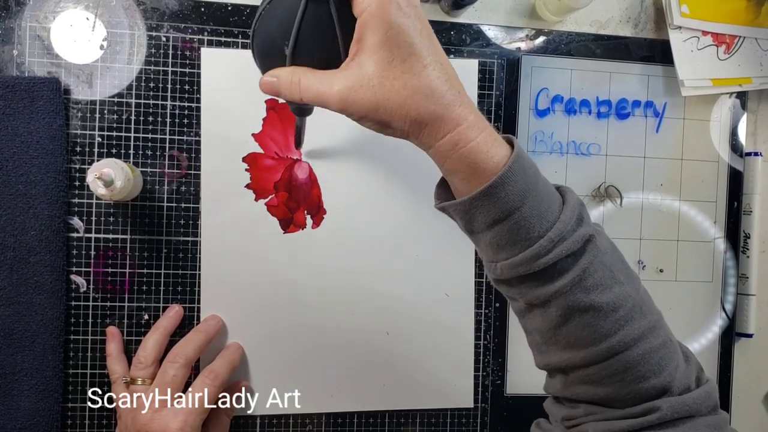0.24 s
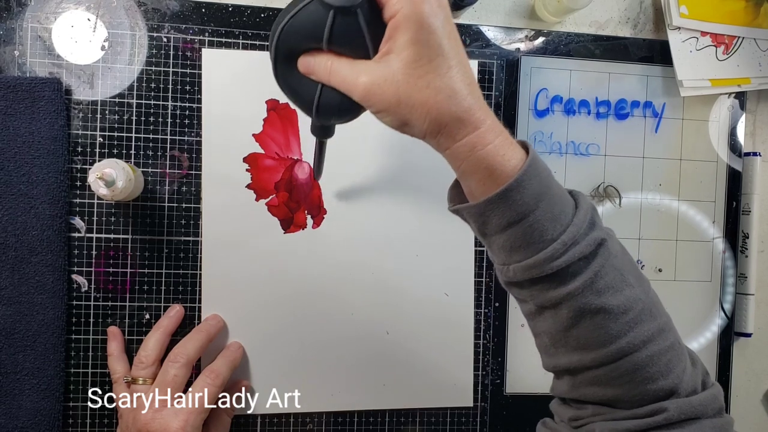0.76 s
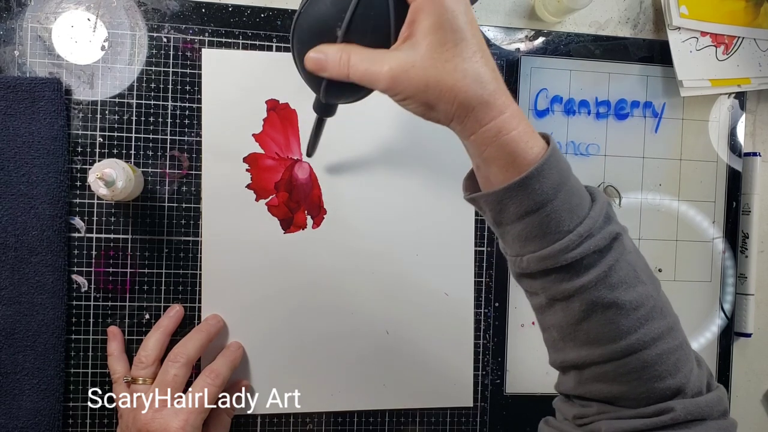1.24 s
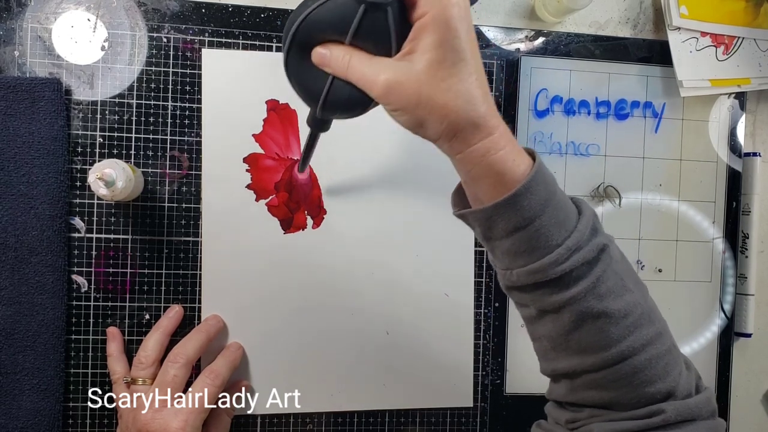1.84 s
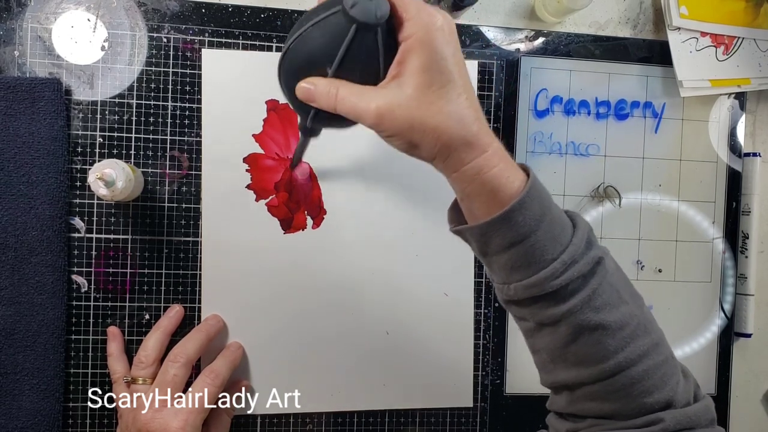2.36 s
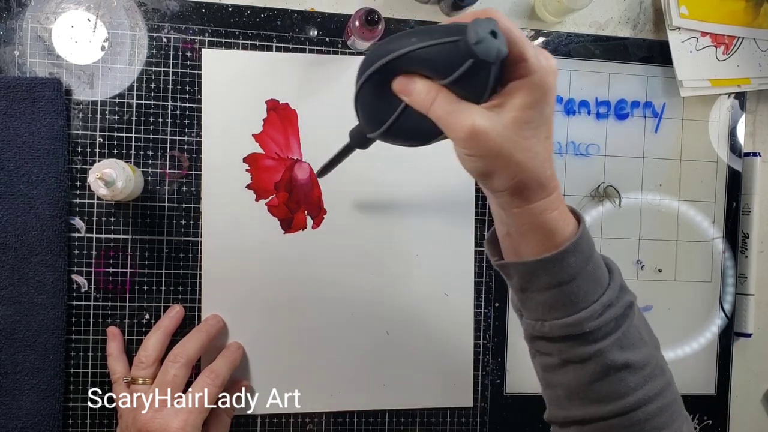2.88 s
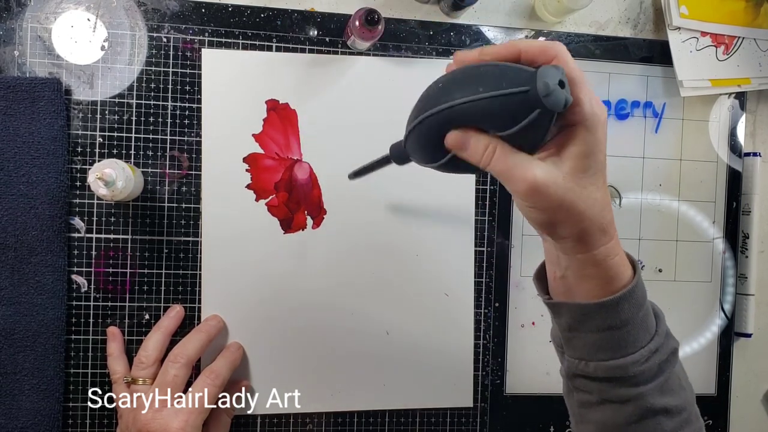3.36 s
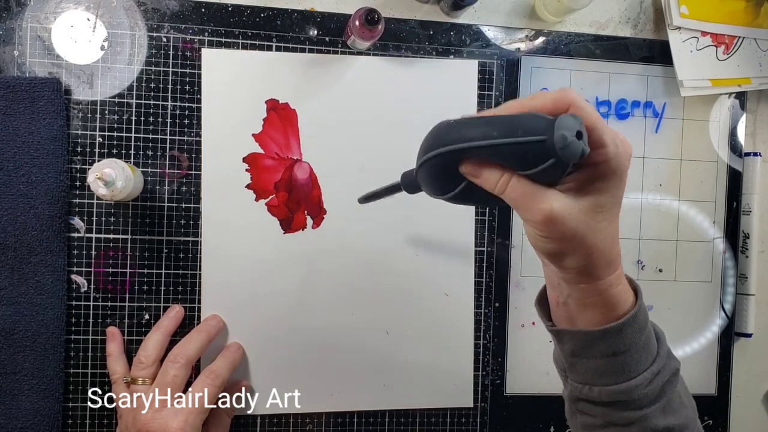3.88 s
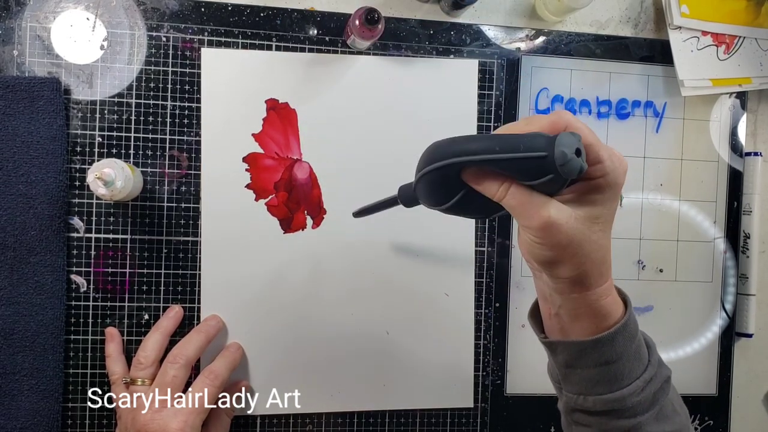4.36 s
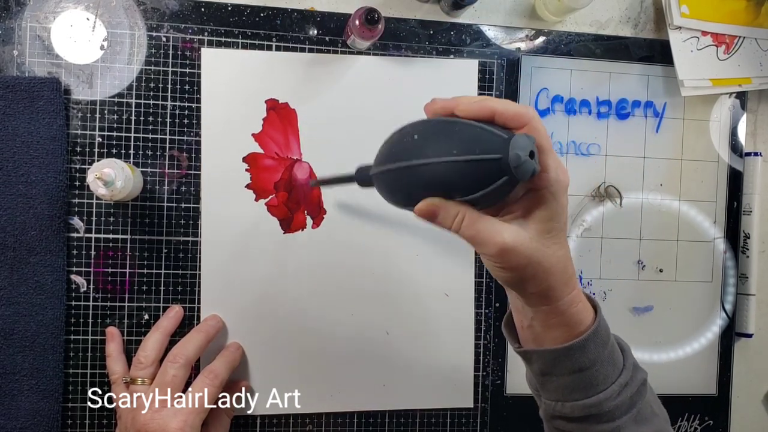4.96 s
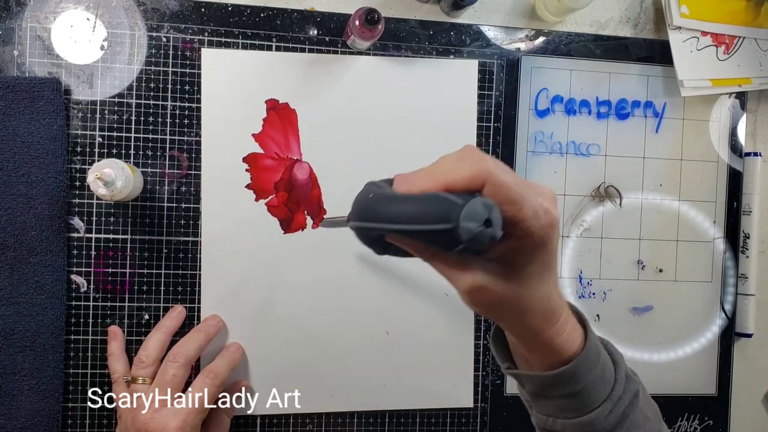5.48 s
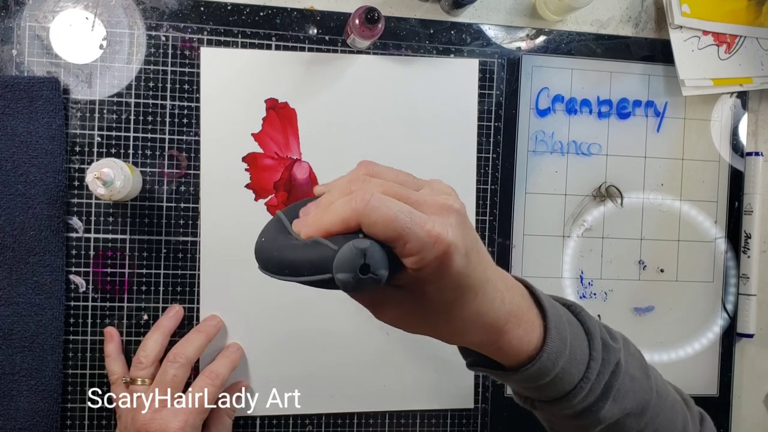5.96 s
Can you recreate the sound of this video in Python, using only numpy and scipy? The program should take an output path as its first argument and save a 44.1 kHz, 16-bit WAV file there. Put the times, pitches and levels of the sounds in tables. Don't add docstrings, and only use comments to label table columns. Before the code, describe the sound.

Close up in a small quiet room, a hand pumps a rubber air blower over paper at nearly three squeezes a second. Each squeeze gives a short bright hiss, then a softer, whistly suck as the bulb refills. Tiny high squeaks precede the early puffs. Midway the bulb is tilted; the puffs get stronger and shriller, joined by dull valve knocks and rubbery pops over faint low ventilation rumble.

```python
import sys
import numpy as np
from scipy import signal
from scipy.io import wavfile
from scipy.ndimage import uniform_filter1d

SR = 44100
rng = np.random.default_rng(int(sys.argv[2]) if len(sys.argv) > 2 else 0)


def level_to_linear(level):
    exponent = np.asarray(level, float) / 20
    return 10 ** exponent


def generate_wav(signal):
    frames = np.transpose(np.atleast_2d(signal))
    scaled = np.clip(frames, -1, 1) * 32767
    pcm = np.round(scaled).astype(np.int16)
    wavfile.write(sys.argv[1], SR, pcm)


N = 274741
TILT_S = (2.73, 3.18)


def evened(x):
    return x / np.sqrt(np.mean(x ** 2) + 1e-20)


def read(points, hz):
    f, value = np.transpose(points)
    return np.interp(np.log(hz + 1), np.log(f + 1), value)


def over_time(points, t):
    return np.interp(t, *np.transpose(points))


def tilt_at(t):
    return np.interp(t, TILT_S, [0, 1])


def resonance(hz, centre_hz, width_hz):
    return 1 / (1 + (2 * (hz - centre_hz) / width_hz) ** 2)


def add(mix, s, sound):
    part = mix[round(s * SR):][:len(sound)]
    part += sound[:len(part)]


def noise_pair(left_db, right_db, likeness, lag, size):
    a, b, c, d = rng.standard_normal((N * 4 // size + 5, size // 2 + 1, 4)).T
    same = np.clip(likeness, 0, 1)[:, None]
    left = a + 1j * b
    right = same * left + np.sqrt(1 - same ** 2) * (c + 1j * d)
    right = right * np.exp(1j * lag)[:, None]
    z = np.array([left * level_to_linear(left_db), right * level_to_linear(right_db)])
    return signal.istft(z, nperseg=size, noverlap=size * 3 // 4)[1][:, :N]


def patches(patchy_db, size, wide=3, long=8):
    field = rng.standard_normal((N * 4 // size + 5, size // 2 + 1)).T
    field = uniform_filter1d(field, wide, axis=0)
    return patchy_db * evened(uniform_filter1d(field, long, axis=1))


# pitch_hz, density_db per Hz
RUMBLE = [(15, -34), (25, -23), (48, 5), (71, 10.5), (88, -0.5), (161, -11), (485, -18.5), (547, -22.5),
          (832, -13), (920, -21.5), (1150, -26), (1290, -24), (1520, -27.5), (2710, -27.5), (3000, -25),
          (3900, -25), (6600, -120)]
# pitch_hz, likeness (0-1)
RUMBLE_LIKENESS = [(30, 1), (200, 0.64), (400, 0.57), (800, 0.22), (3000, 0)]
# start_s, level_db
GUSTS = [
    (.3, -2),
    (.61, 11),
    (.83, 2.5),
    (1.09, 4.5),
    (1.7, 13.5),
    (2.67, 4.5),
    (3.95, 12),
    (4.42, 2.5),
    (5.4, 6),
]
# pitch_hz, level_db
FAR_HISS = [(1500, -10.5), (4500, -14), (7000, -4.5), (8600, -8.5), (11000, -0.5), (15500, 2)]
# pitch_hz, left_minus_right_db
PORTS_TILTED = [(1000, 2.5), (5000, 0.5), (7000, 0.5), (8700, 5), (10000, 5), (11000, -25.5), (12500, -8),
                (13800, -28), (15300, -22.5)]


def room_air():
    size, rumble_db, hiss_db, gust_s = 4096, -69, -68.5, 0.023
    hz, t = np.fft.rfftfreq(size, 1 / SR), np.arange(N // 1024 + 5) * 1024 / SR
    swell_db = sum(db * np.exp(-((t - s) / gust_s) ** 2) for s, db in GUSTS)
    db = read(RUMBLE, hz)[:, None] + patches(2.33, size, wide=4, long=4)
    db = db + np.outer(hz < 105, swell_db - 3.0)
    rumble = noise_pair(db - 0.8, db + 0.28, read(RUMBLE_LIKENESS, hz), 0 * hz, size)
    db = read(FAR_HISS, hz)[:, None]
    hiss = noise_pair(db + 0.31 * read(PORTS_TILTED, hz)[:, None], db, 0 * hz, 0 * hz, size)
    return level_to_linear(rumble_db) * evened(rumble) + level_to_linear(hiss_db) * evened(hiss)


# pitch_hz, t60_s
ROOM_DECAY = [(150, 0.51), (2000, 0.31), (7000, 0.21), (11000, 0.17), (15000, 0.22)]
# delay_s, left_db, right_db
DESK_ECHOES = [
    (.0009, -47, -37),
    (.0017, -26, -31),
]


def room(x):
    room_db, turn_hz = -12.5, 3.1
    taps = np.zeros((6, SR // 2))
    at = np.arange(400, SR // 2 - 20, 20) + rng.integers(0, 20, (6, (SR // 2 - 401) // 20))
    np.put_along_axis(taps, at, rng.choice([-1., 1.], at.shape), 1)
    hz, t, z = signal.stft(taps, SR, nperseg=256)
    decay = level_to_linear(-60 * t / read(ROOM_DECAY, hz)[:, None])
    tails = signal.istft(z * decay, SR, nperseg=256)[1]
    tails = level_to_linear(room_db) * tails / np.linalg.norm(tails[0])
    out = x.copy()
    for k in range(3):
        share = np.sqrt(2 / 3) * np.cos(2 * np.pi * (turn_hz * np.arange(N) / SR + k / 3))
        out += signal.fftconvolve(x * share, tails[2 * k:2 * k + 2], axes=1)[:, :N]
    for s, left_db, right_db in DESK_ECHOES:
        late = round(s * SR)
        out[:, late:] += level_to_linear(np.array([[left_db], [right_db]])) * x[:, :N - late]
    return out


# start_s, peak_db
SQUEAKS = [
    (0.1895, -66),
    (0.5397, -65),
    (0.8764, -57),
    (1.2141, -55),
    (1.5628, -56),
    (1.915, -54),
    (2.2752, -57),
    (2.628, -56),
]


def valve_squeaks():
    out, t = np.zeros(N), np.arange(round(0.0096 * SR)) / SR
    for s, db in SQUEAKS:
        waver_hz = 2500 * uniform_filter1d(rng.standard_normal(len(t)), 12)
        hz = 12400 + 3100 * t / t[-1] + waver_hz
        whistle = np.sin(2 * np.pi * np.cumsum(hz) / SR) * np.hanning(len(t))
        add(out, s - .002, level_to_linear(db - 2.0) * whistle)
    return out * level_to_linear(np.array([[-18.], [0.]]))


def thumps(events, rebounds, cycles, spacing, overtone_db):
    out, chance = np.zeros(N), rng.uniform(-2.0, 1, (len(events), 8))
    for (s, db, hz), c in zip(events, chance):
        for k, (after, fall_db) in enumerate(rebounds):
            t = np.arange(round(cycles / hz * SR)) / SR
            turns = t * hz * 1.067 * (1 + 0.055 * k * c[k])
            burst = np.sin(2 * np.pi * turns) + level_to_linear(overtone_db) * np.sin(2 * np.pi * 1.98 * turns)
            fade = np.hanning(2 * len(turns))[len(turns):]
            shape = (turns / 0.91 * np.exp(1 - turns / 0.84)) ** 2 * fade
            start_s = s + 0.0011 + spacing * after * (1 + 0.058 * c[k + 4])
            add(out, start_s, level_to_linear(db + fall_db) * burst * shape ** 0.96)
    return out * level_to_linear(np.array([[-1.], [1.]]))


# start_s, peak_db, pitch_hz
KNOCKS = [
    (3.384, -63, 259),
    (3.719, -55.5, 257),
    (4.513, -51.5, 250),
    (4.93, -46.5, 245),
    (5.322, -46.5, 258),
    (5.688, -53, 248),
    (6.038, -50, 250),
]
# delay_s, level_db
FLAP_BOUNCES = [
    (0, -3),
    (.009, -10.5),
    (0.03, -11),
    (.056, -9),
]


def valve_knocks():
    return thumps(KNOCKS, FLAP_BOUNCES, cycles=4.8, spacing=0.48, overtone_db=-10.5)


# start_s, peak_db, pitch_hz
POPS = [
    (3.3, -59, 143),
    (3.641, -53.5, 141),
    (3.986, -51.5, 145),
    (4.398, -51, 146),
    (4.808, -51, 143),
    (5.21, -50, 145),
    (5.619, -56, 144),
    (5.96, -53, 148.5),
]
# delay_s, level_db
WALL_REBOUNDS = [
    (0, 3.5),
    (0.0161, -0.5),
    (0.037, -2.5),
    (.052, -19),
]


def wall_pops():
    return thumps(POPS, WALL_REBOUNDS, cycles=7.8, spacing=1.01, overtone_db=-9)


def phased(rows, phases, pace, aim, core_db):
    flow_db, low_db, top_db, tilted_top_db = np.transpose(phases)
    late, out = np.array([0, 0, 0, 1, 1]), []
    for start, length, crest_db, lean_db, rush_db in rows:
        tilt = tilt_at(start)
        opening_s = np.interp(tilt, [0, 1], pace[:2])
        shutting_s = np.interp(tilt, [0, 1], pace[3:])
        s = start + np.array([-opening_s, 0, pace[2] * length, length, length + shutting_s])
        stroke_db = crest_db + flow_db + late * lean_db
        fizz_db = top_db + tilt * (tilted_top_db - top_db) + over_time(aim, start)
        out.append(np.transpose([s, stroke_db, rush_db + low_db, fizz_db, tilt * np.array(core_db)]))
    return out


def stroke_flow(strokes):
    flow = np.zeros(N)
    for rows in strokes:
        s, flow_db = np.transpose(rows)[:2]
        u = np.arange(s[0], s[-1], 1 / SR)
        pressure = np.interp(u, s, level_to_linear(flow_db / 3))
        add(flow, u[0], pressure ** 3 * signal.windows.tukey(len(u), .12))
    return uniform_filter1d(flow, 70)


# pitch_hz, width_hz, upright_db, tilted_db
PIPE_MODES = [(9000, 700, -2, 2), (10680, 385, 16, 10.5), (12850, 320, -1.5, 11.5), (13400, 900, 2, 7.5),
              (14950, 330, -1.5, 16)]
# pitch_hz, left_minus_right_db
PORTS_UPRIGHT = [(1000, 2), (5000, -4), (7000, -0.5), (8800, 3.5), (10000, 8.5), (11000, -26),
                 (12500, -11.5), (13600, -37), (15300, -29.5)]
# pitch_hz, likeness (0-1)
PORT_LIKENESS = [(500, 1), (1500, 1), (3000, 0.5), (4300, 0.4), (6500, 0.59), (9500, 0.27), (11500, 0.9),
                 (15000, 0.1)]
# pitch_hz, lag_rad
PORT_LAG = [(500, 0.5), (3000, 1.02), (4300, 1), (5000, 4.5), (7800, 3.5), (10000, -1.5), (12000, 9.5)]
# start_s, left_minus_right_db
PLACE = [(0.0, 8), (0.55, 7), (1.92, 5), (2.41, 6.5), (3.04, 3), (3.4, 2.5), (3.7, 3), (5.4, 3), (5.74, 4),
         (6.23, 2.5)]


def air(strokes, colour, echoes, tube_share, patchy_db, flutter_db, size=512):
    hz, t = np.fft.rfftfreq(size, 1 / SR), np.arange(N * 4 // size + 5) * size / 4 / SR
    s, _, low_db, top_db, core_db = np.concatenate(strokes).T
    tilt = tilt_at(t)
    low, top = np.interp(hz, [4500, 6200], [1, 0]), np.interp(hz, [9300, 10500], [0, 1])
    pipe_db = sum(np.outer(resonance(hz, f, w), up + (flat - up) * tilt) for f, w, up, flat in PIPE_MODES)
    sway = 1 + patches(0.13, size, wide=20, long=40)
    db = read(colour, hz)[:, None] + tube_share * pipe_db * sway
    db = db + np.outer(low, np.interp(t, s, low_db - np.median(low_db)))
    db = db + np.outer(top, np.interp(t, s, top_db - np.median(top_db))) + patches(patchy_db, size)
    db = db + np.outer(resonance(hz, 8800, 730), np.interp(t, s, core_db))
    db = db + (low + 0.47)[:, None] * patches(1.47, size, wide=2, long=36)
    for up, flat, ripple_db in echoes:
        comb = np.cos(2 * np.pi * np.outer(hz, up + (flat - up) * tilt))
        db = db + ripple_db * np.outer(low + 0.17, 1 - .5 * tilt) * comb
    left_db = read(PORTS_TILTED, hz)[:, None]
    right_db = np.outer(read(PORTS_TILTED, hz) - read(PORTS_UPRIGHT, hz), 1 - tilt)
    side_db = over_time(PLACE, t) / 2 - 1.5
    pair = noise_pair(db + left_db + side_db, db + right_db - side_db,
                      read(PORT_LIKENESS, hz), read(PORT_LAG, hz), size)
    pair = pair / np.sqrt(uniform_filter1d(pair.mean(0) ** 2, 6000))
    eddies = evened(uniform_filter1d(uniform_filter1d(rng.standard_normal(N), 150), 150))
    return pair * stroke_flow(strokes) * level_to_linear(flutter_db * eddies)


# start_s, refill_s, crest_db, lean_db (crest to end), low_rush_db (re flow)
RELEASES = [ (0.032, 0.08, -53, -1.5, -14), (0.365, 0.085, -56, 1, -15), (0.710, 0.084, -53, -3.5, -11.5),
            (1.062, 0.073, -51.5, -3.5, -13), (1.398, 0.085, -51.5, -4.5, -10.5),
            (1.750, 0.092, -48, -4.5, -12), (2.112, 0.08, -48, -5, -14), (2.474, 0.086, -48, -9, -13.5),
            (2.824, .100, -46, -2, -11.5), (3.195, 0.11, -46, -7, -9.5), (3.552, 0.095, -45, -2, -11.5),
            (3.908, 0.088, -44.5, 0, -11.5), (4.311, 0.098, -44, 1.5, -9.5), (4.730, 0.097, -43, 1, -4.5),
            (5.130, 0.097, -44, -1, -4.5), (5.533, .091, -44.5, 1, -7.5), (5.893, .078, -46, 2.5, -8),
            (6.230, 0.073, -50, 17, -5)]
# flow_db (re crest), low_rush_db, upright_fizz_db, tilted_fizz_db
REFILL = [
    (-23, -3, -4, -11.5),
    (-4, -0.5, -2, -1.5),
    (-1, 4, 1.5, 0.5),
    (0, 0.5, -9, -9),
    (-23, 10.5, -5.5, -13),
]
# opening_upright_s, opening_tilted_s, crest (share of length), shutting_upright_s, shutting_tilted_s
REFILL_PACE = (0.028, 0.029, 0.39, 0.028, 0.025)
REFILL_CORE = [0, 0, 0, 0, 0]
# start_s, level_db
INLET_AIM = [(0., 0), (1.4, -1.7), (2.1, 0.16), (3.2, 0), (4.3, -0.78), (4.8, 2), (5.6, -1.2), (6.2, 0)]
# pitch_hz, level_db
INTAKE = [(500, -28), (1000, -23.5), (2000, -13.5), (3500, -8), (5200, -3.5), (6600, 4.5), (8200, 1.5),
          (9800, -7), (11300, 3), (12250, 3.5), (13500, -11), (15300, -2.5)]


def refill_intake():
    strokes = phased(RELEASES, REFILL, REFILL_PACE, INLET_AIM, REFILL_CORE)
    return level_to_linear(0.5) * air(strokes, INTAKE, [], tube_share=1., patchy_db=2.0, flutter_db=0.0)


# start_s, push_s, crest_db, lean_db (crest to end), low_rush_db (re flow)
SQUEEZES = [ (0.208, 0.07, -42.5, -3.5, -16), (0.557, 0.059, -44, -0.5, -18),
            (0.893, 0.069, -45.5, -1, -17), (1.238, 0.07, -41.5, -3, -14), (1.591, 0.069, -39.5, -5, -15),
            (1.937, 0.075, -40.5, -2, -15.5), (2.298, 0.074, -40, -5, -15), (2.646, 0.083, -39.5, -10, -17),
            (3.035, 0.063, -37, -3.5, -13.5), (3.395, 0.061, -35.5, -1, -14.5),
            (3.734, 0.068, -39, 5, -16.5), (4.105, 0.083, -39.5, 1.5, -16), (4.528, 0.089, -41, 4.5, -17.5),
            (4.944, 0.081, -40, 3.5, -14), (5.338, 0.084, -40, 2.5, -14.5), (5.709, 0.068, -36.5, 3, -14.5),
            (6.062, 0.075, -38.5, -0.5, -11)]
# flow_db (re crest), low_rush_db, upright_fizz_db, tilted_fizz_db
PUSH = [
    (-39, -3, -8, -10.5),
    (-16, -2.5, 0.5, 1.5),
    (1, -2, -0.5, -1),
    (1, -2.5, 0.5, -4),
    (-52, 10, 3.5, -4),
]
# opening_upright_s, opening_tilted_s, crest (share of length), shutting_upright_s, shutting_tilted_s
PUSH_PACE = (0.016, 0.023, 0.63, 0.028, 0.052)
PUSH_CORE = [19, 11.5, 9, 0.5, -4.5]
# start_s, level_db
NOZZLE_AIM = [(0.2, -1), (.6, -2), (1.3, -2), (2.0, -0.5), (2.35, 0), (2.7, -4.5), (3.1, 5), (3.45, 4),
              (4.15, 1.5), (4.6, 0), (4.999, 5), (5.4, 2.5), (5.75, -0.5), (6.1, 1.5)]
# pitch_hz, level_db
JET = [(500, -35), (1300, -32.5), (2300, -19.5), (3500, -16.5), (5200, -9.5), (7200, 2.5), (8600, -3.5),
       (9700, -10), (11000, 0.5), (12400, -3.5), (13000, -12), (15300, -8)]
# upright_s, tilted_s, ripple_db
PAPER_ECHOES = [(.00212, 0.002513, 1.5), (.00322, 0.0027, 0)]


def squeeze_jets():
    strokes = phased(SQUEEZES, PUSH, PUSH_PACE, NOZZLE_AIM, PUSH_CORE)
    return level_to_linear(1.0) * air(strokes, JET, PAPER_ECHOES, tube_share=0.54, patchy_db=2.0, flutter_db=1.0)


def scene():
    blower = squeeze_jets() + refill_intake() + wall_pops() + valve_knocks() + valve_squeaks()
    return room(blower) + room_air()


def top_cut(x):
    return signal.sosfilt(signal.butter(12, 15800, fs=SR, output="sos"), x)


def record(dry):
    bass_hz, top_hz = 42, 15570
    x = signal.sosfilt(signal.butter(2, bass_hz, "high", fs=SR, output="sos"), dry)
    lowpass = signal.firwin(1023, top_hz, window=("kaiser", 10), fs=SR)
    mix = signal.oaconvolve(x, lowpass[None], "same")
    return top_cut(mix)


dry = scene()
out = record(dry)
generate_wav(out)
```